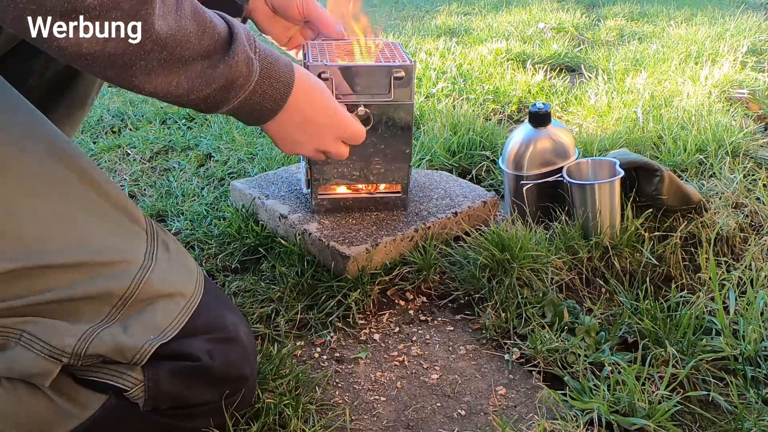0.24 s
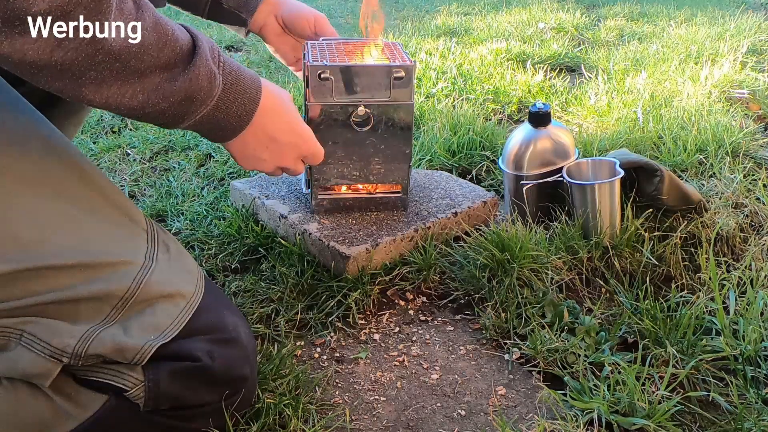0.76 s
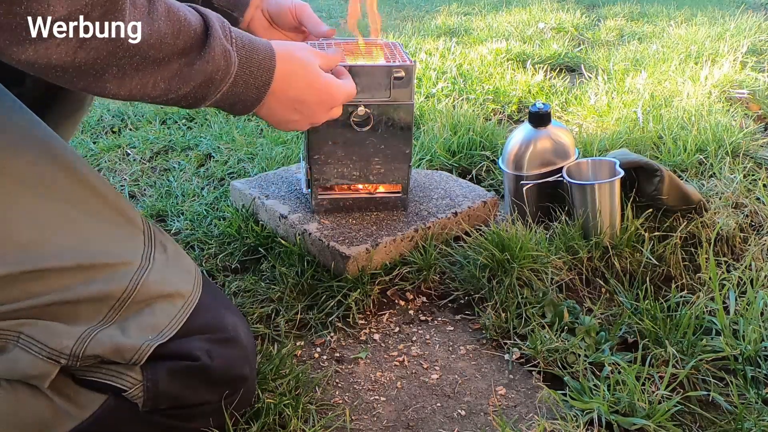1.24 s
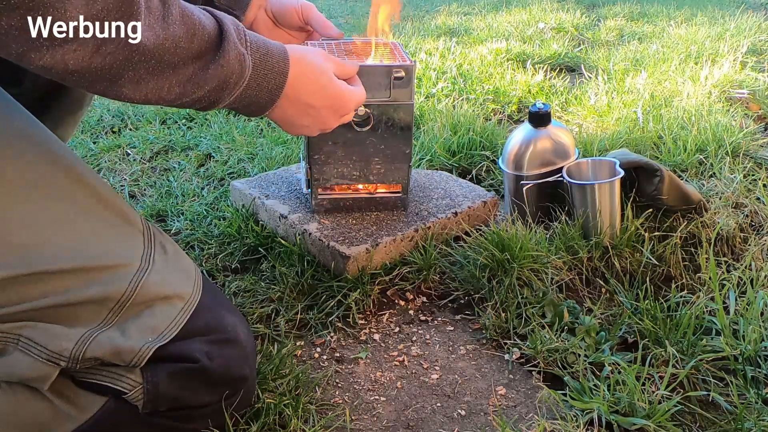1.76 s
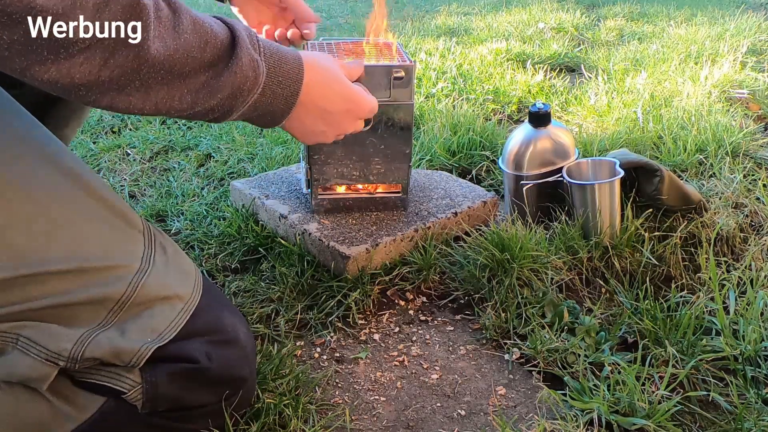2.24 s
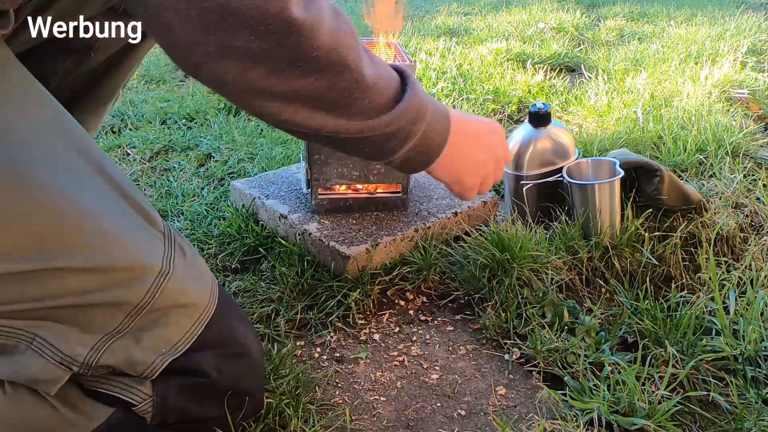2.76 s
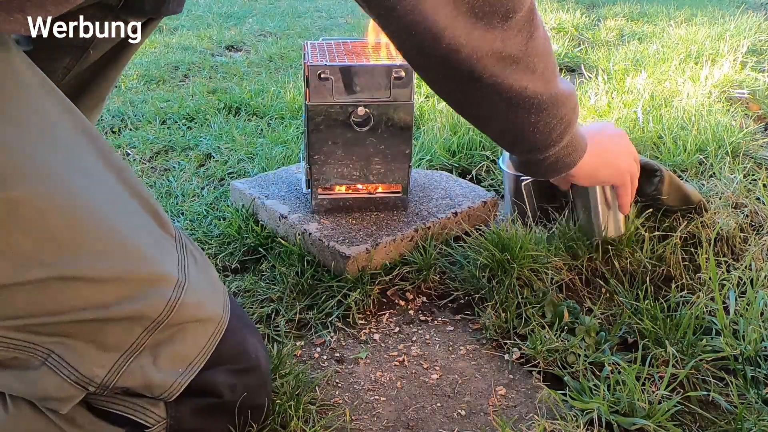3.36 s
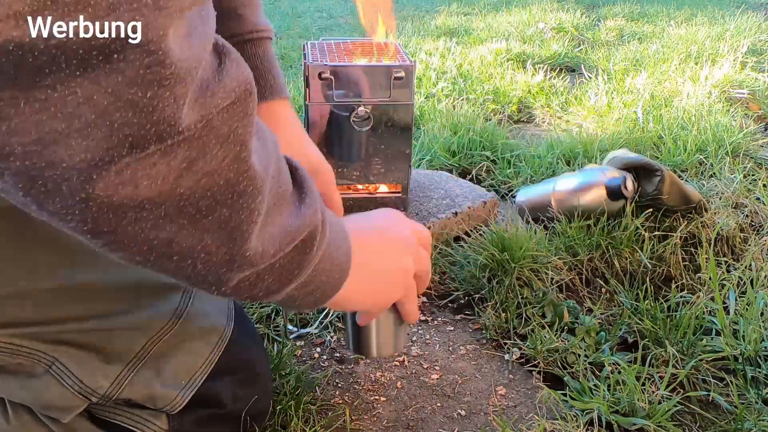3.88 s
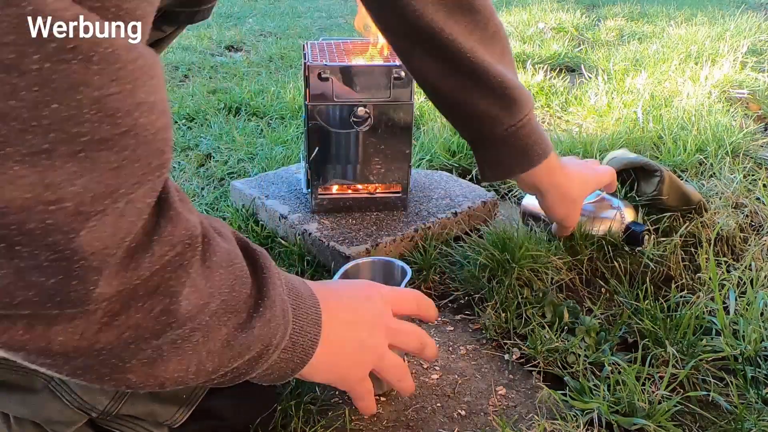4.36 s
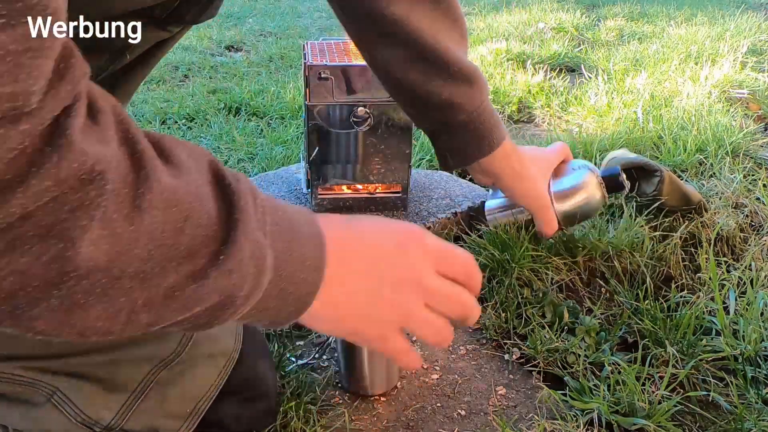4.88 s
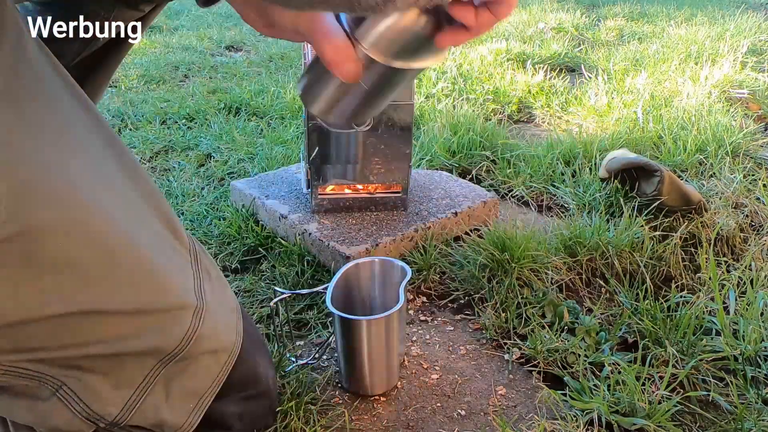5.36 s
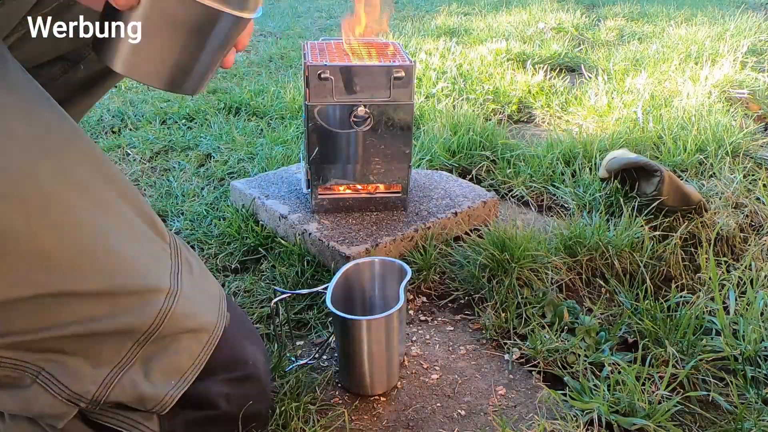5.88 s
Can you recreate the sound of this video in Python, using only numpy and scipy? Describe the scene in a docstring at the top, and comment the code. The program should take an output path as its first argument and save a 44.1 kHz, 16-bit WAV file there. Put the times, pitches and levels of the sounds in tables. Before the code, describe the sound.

Wind rumbles over small metallic clicks and a bright scraping clank, followed by hollow cup knocks, ringing clinks and a sloshing canteen's wobbling low hum.

```python
"""Someone kneels on a lawn in gusty wind; sheet steel clicks and snaps as a grate goes on a small wood stove.
The grate slides home in weakening slips: bursts of chatter through dense sheet ringing and longer sine modes.
A steel cup knocks hollowly, sings and clinks; the canteen's gliding sines bend as water sloshes inside.
A palm then slides on the canteen. Throughout, shaped noise makes wind rumble, open air and rustling clothes;
short resonant bursts make dull thuds, ticking twigs and grit."""
import sys
import numpy as np
from scipy import signal
from scipy.fft import rfft, irfft
from scipy.io import wavfile
from scipy.ndimage import uniform_filter1d

SR = 44100
rng = np.random.default_rng(int(sys.argv[2]) if len(sys.argv) > 2 else 0)


def waveform_to_disk(signal):
    """Save audio, clipped to [-1, 1], as 16-bit WAV at the path in sys.argv[1]."""
    frames = np.transpose(np.atleast_2d(signal))
    scaled = np.clip(frames, -1, 1) * 32767
    samples = np.round(scaled).astype(np.int16)
    wavfile.write(sys.argv[1], SR, samples)


N = 270421
T = np.arange(N) / SR


def undb(db):
    """Decibels to gain."""
    return 10 ** (np.asarray(db) / 20)


def curve(rows, column=1):
    """One column of a table, joined by straight lines in time."""
    rows = np.array(rows)
    return np.interp(T, rows[:, 0], rows[:, column])


def add(out, at_s, sound):
    """Mix a sound in from a given moment on."""
    start = int(at_s * SR)
    out[start:start + len(sound)] += sound[:N - start]


def colour_db(points, hz):
    """A spectrum read on a log-frequency axis."""
    f, db = np.transpose(points)
    return np.interp(np.log(hz + 1), np.log(f), db)


def response(db_of_hz, size=2048):
    """Causal (minimum-phase) impulse response of unit energy with the given spectral shape."""
    hz = np.arange(size // 2 + 1) * SR / size
    cepstrum = irfft(np.log(undb(db_of_hz(hz)) + 1e-6))
    # folding the cepstrum puts the energy as early as possible
    cepstrum[1:size // 2] *= 2
    cepstrum[size // 2 + 1:] = 0
    h = irfft(np.exp(rfft(cepstrum)))
    return h / np.linalg.norm(h)


def grains(count, spread_db):
    """Dense micro-impacts of uneven size, rms 1."""
    x = rng.standard_normal(count) * undb(spread_db * rng.standard_normal(count))
    return x / x.std()


def fade(t, rise_s, t60_s):
    """A straight rise and an exponential decay."""
    return np.minimum(t / rise_s, 1) * undb(-60 * np.maximum(t - rise_s, 0) / t60_s)


def burst(db, rise_s, t60_s, click_db=16):
    """One contact: chatter that dies away, with a click at full contact that slower rises soften."""
    t = T[:SR // 2]
    force = fade(t, rise_s, t60_s) * grains(len(t), spread_db=4.5)
    force[int(rise_s * SR)] += undb(click_db) * np.exp(-rise_s / 0.00084)
    return undb(db) * force


def walk(rate):
    """Smooth random wander with a spread of 1, from about `rate` new values a second."""
    k = int(SR / rate)
    steps = np.repeat(rng.standard_normal(N // k + 1), k)
    x = uniform_filter1d(steps, k)[:N]
    return x / x.std()


def shaped(x, points):
    """A steady signal given a spectrum, rms 1."""
    gain = undb(colour_db(points, np.arange(N // 2 + 1) * SR / N))
    y = irfft(rfft(x) * gain, N)
    return y / y.std()


def swells(rows, rest=0):
    """Gain of bell-shaped swells whose power adds to a resting gain."""
    power = rest ** 2
    for at_s, db, width_s in rows:
        power = power + undb(db) ** 2 * np.exp(-((T - at_s) / width_s) ** 2)
    return np.sqrt(power)


def tap(at_s, db, centre_hz, t60_s, sharpness, order):
    """A small blow coloured by one resonance."""
    def resonance_db(hz):
        detune = hz / centre_hz - centre_hz / (hz + 1)
        return -10 * order * np.log10(1 + (sharpness * detune) ** 2)

    out = np.zeros(N)
    add(out, at_s, signal.fftconvolve(burst(db, .0006, t60_s), response(resonance_db)))
    return out


def sheet_ring(db, t60_s):
    """The direct sound plus a crowd of short-lived modes, shared by every contact on one object."""
    t = T[:SR // 8]
    h = fade(t, 0.001, t60_s) * rng.standard_normal(len(t))
    h *= undb(db) / np.linalg.norm(h)
    h[0] = 1
    return h / np.linalg.norm(h)


def steel(contacts, body, modes):
    """Each contact chatters through the dense, short resonances of the sheet and wakes a few longer modes.

    contacts: t/s, level/dB, rise/s, t60/s, tilt/(dB per octave), ring relative to the contact/dB
    """
    t, out = T[:SR // 3], np.zeros(N)
    mode_hz, mode_db, mode_t60 = np.transpose(modes)[:, :, None]
    crowd = sheet_ring(db=-3, t60_s=0.036)
    for at_s, db, rise_s, t60_s, tilt_db, ring_db in contacts:
        sheet = response(lambda hz: colour_db(body, hz) + tilt_db * np.log2(1 + hz / 1000))
        chatter = burst(db, rise_s, t60_s)
        add(out, at_s, signal.fftconvolve(chatter, signal.fftconvolve(sheet, crowd)))
        # every point of contact shares its energy differently among the modes
        share = undb(mode_db + 1.0 * rng.standard_normal(mode_db.shape))
        tones = np.sin(2 * np.pi * (mode_hz * t + rng.random(mode_hz.shape)))
        # the chatter keeps feeding the modes, so a long scrape rings longer
        envelope = fade(t, rise_s, np.hypot(mode_t60, t60_s / 2))
        ring = (share * envelope * tones).sum(axis=0)
        add(out, at_s, undb(db + ring_db) * np.sqrt(2) * ring / np.linalg.norm(share))
    return out


def open_air():
    """Broad noise of the open air whose level wanders slowly."""
    # Spectrum of the air: f/Hz, relative level/dB
    air_colour = [(30, 5), (70, 6), (130, 3), (250, -0.5), (500, -5.5), (1000, -9.5), (1600, -12.5),
                  (2500, -24.5), (5000, -28), (8500, -21.5), (10500, -26), (16000, -27.5)]
    return shaped(rng.standard_normal(N), air_colour) * undb(-60.5 + 1.6 * walk(6.8))


def wind():
    """Slow eddies push on the microphone; only their upper edge is heard, as rumble that follows the gusts."""
    # Spectrum of the eddies: f/Hz, relative level/dB
    wind_colour = [(2, 12.5), (6, 26.5), (13, 9.5), (25, -0.5), (40, -8.5), (60, -23.5), (100, -32.5),
                   (200, -46), (500, -64), (1500, -85)]
    # Gusts: t of the peak/s, level/dB, half-width (at 1/e power)/s
    gusts = [(.05, -38.5, 0.13), (.38, -37.5, 0.14), (.78, -44.5, 0.13), (1.47, -34, 0.052),
             (1.75, -39.5, .11), (2.3, -41.5, 0.16), (3.27, -51, 0.034), (4.05, -60.5, 0.051),
             (4.46, -56, 0.041), (5.62, -58.5, 0.11)]
    # Breeze between the gusts, dying down overall: t/s, level/dB
    breeze = [(0, -52), (2.6, -47), (3.0, -59), (4.6, -59), (5.2, -71), (6.13, -67.5)]
    eddies = shaped(rng.standard_normal(N), wind_colour)
    heard = signal.sosfiltfilt(signal.butter(2, (20, 70), "band", fs=SR, output="sos"), eddies)
    power = uniform_filter1d(heard ** 2, size=SR // 5)
    strength = np.sqrt(uniform_filter1d(power, size=SR // 5))
    # level the audible rumble before the gusts shape it
    return eddies / strength * swells(gusts, rest=undb(curve(breeze)))


def clothes():
    """Sleeves and trousers rustle: grainy noise swells with each movement and flutters in level."""
    # Spectrum of the cloth: f/Hz, relative level/dB
    cloth_colour = [(150, 9), (600, 9.5), (1500, 5), (2500, 3.5), (4000, 0.5), (6500, -3.5), (8700, -2),
                    (10000, -20), (13000, -8.5), (16000, -21)]
    # Arm and leg movements: t of the peak/s, level/dB, half-width (at 1/e power)/s
    moves = [(0, -68, 0.24), (3.0, -62.5, 0.26), (3.6, -60.5, 0.22), (3.8, -55.5, 0.039),
             (4.25, -66.5, 0.33), (4.88, -65, .14), (5.49, -52.5, 0.046), (5.6, -58.5, 0.053),
             (5.78, -58, 0.064), (6.05, -58.5, 0.12)]
    rustle = shaped(grains(N, spread_db=3.5), cloth_colour)
    return rustle * swells(moves, rest=undb(-70)) * undb(2.03 * walk(40))


def sliding_palm():
    """A palm catches and slides on the canteen: very uneven grains in short swells."""
    # Spectrum of skin on steel: f/Hz, relative level/dB
    grip_colour = [(880, -36), (1500, -18), (3150, -9), (3620, -9), (4420, -2), (6760, -3.5), (8660, 1),
                   (13500, -4), (16000, -12)]
    # Slides of the palm: t of the peak/s, level/dB, half-width (at 1/e power)/s
    slides = [(5.51, -60, .04), (5.585, -50, 0.024), (5.71, -68, 0.034)]
    catches = grains(N, spread_db=8) * undb(3 * walk(150))
    return shaped(catches, grip_colour) * swells(slides)


def grit(count):
    """Faint bright ticks of grit fall at random while the canteen is handled."""
    from_s, to_s = 4.3, 6.05
    level_db, spread_db = -56, 2
    out = np.zeros(N)
    for when, size in rng.random((count, 2)):
        at_s = from_s + when * (to_s - from_s)
        out += tap(at_s, level_db + spread_db * (2 * size - 1), 9400, .03, sharpness=1, order=1)
    return out


def ticks():
    """Clear ticks of twigs and metal: small blows on one resonance; a sharper one rings longer."""
    # Twigs and small ticks of metal: t/s, level/dB, f/Hz, sharpness Q
    tick_rows = [(2.563, -54.5, 6000, .17), (2.9426, -55, 3080, 2.5), (3.083, -50.5, 4870, 0.59),
                 (3.789, -49, 9000, .57), (4.25, -43.5, 2140, 7), (4.3743, -50.5, 5800, 8.7),
                 (5.0633, -48, 3140, 15), (5.112, -51.5, 8900, .8), (5.228, -42.5, 2820, 1.5),
                 (5.479, -50, 3000, .95), (5.639, -51.5, 11000, 0.97)]
    return sum(tap(at_s, db, hz, .03 * q ** .22, q, order=1) for at_s, db, hz, q in tick_rows)


def thuds():
    """Dull blows on hand and soil, each through one broad, steep-sided resonance."""
    # Thuds: t/s, level/dB, f/Hz, t60/s
    thud_rows = [(.23, -44, 680, .073), (3.59, -55, 460, 0.034), (3.658, -52.5, 193, 0.14),
                 (3.79, -51.5, 203, 0.3), (3.915, -50, 181, .074), (3.968, -42.5, 209, .087),
                 (4.134, -38, 240, 0.29), (4.727, -46, 246, 0.24), (4.885, -33.5, 927, .029),
                 (5.229, -40.5, 630, 0.1), (5.243, -41, 226, .06)]
    return sum(tap(*row, sharpness=1.25, order=2) for row in thud_rows)


def stove_contacts():
    """Every knock on the stove, followed by its loose panel settling."""
    # Knocks on the stove: t/s, level/dB, t60/s, tilt/(dB per octave)
    knocks = [(.157, -57, 0.13, -7), (.202, -57, 0.27, -3.5), (.232, -43.5, 0.076, -2.5),
              (1.4463, -38, .11, 1), (1.497, -56, .1, -8), (1.574, -46.5, .15, 6),
              (1.9054, -42.5, 0.043, -2.5), (1.9832, -38.5, 0.077, 1), (2.123, -57.5, .12, -7)]
    contacts = []
    for at_s, db, t60_s, tilt_db in knocks:
        # a softer contact is duller, rises more slowly and leaves more to the modes
        rise_s = 0.0013 * 2 ** (-tilt_db / 6)
        contacts.append((at_s, db, rise_s, t60_s, tilt_db, -10.5 - 0.69 * tilt_db))
        # the panel settles later, weaker, duller, with a slower rise and its own decay
        contacts.append((at_s + .013, db - 12.5, 2 * rise_s, 0.14, tilt_db - 2, -5))
    return contacts


def stove():
    """Sheet steel clicks: knocks and settling panels excite the stove's body and modes."""
    # Broad colour of the stove: f/Hz, relative level/dB
    body = [(240, -12), (400, -6), (1400, -8), (1650, -15), (2400, -5), (2670, -9.5), (3020, 0.5),
            (3580, -8), (4510, -1.5), (6150, -8.5), (7510, -2), (9760, -10.5), (10200, -16.5),
            (12900, -8.5), (16000, -26)]
    # Ringing modes of the stove: f/Hz, relative level/dB, own t60/s
    modes = [(1307, 6, .06), (2200, 1, 0.07), (2970, -6, 0.075), (3170, 7, 0.14), (4360, 6, 0.05),
             (4220, 13, .05), (5300, -13.5, .04), (5900, 3.5, 0.17), (6740, -7, .05), (7410, -12, .05),
             (7950, -23, .04), (8280, 9, 0.051), (9610, -10, .04), (12500, -11, .03), (12902, -3, .03)]
    return steel(stove_contacts(), body, modes)


def snap():
    """One very short, bright crack at the stove with well damped resonances."""
    # The snap, one row: t/s, level/dB, t60/s
    snap_row = (1.5708, -22.5, 0.013)
    # Resonances of the snap: f/Hz, width/Hz, height of the boost relative to 7 dB, as a level/dB
    snap_peaks = [(1910, 88, 9), (4330, 170, -8), (5620, 89, -10), (7420, 100, -4), (8500, 160, -3),
                  (9560, 97, -7), (12700, 200, -13), (13600, 270, 3)]
    # Broad colour of the snap: f/Hz, relative level/dB
    snap_body = [(350, -40), (600, -10), (1450, -14.5), (1960, -10.5), (2440, -6.5), (3830, -11.5),
                 (4460, 0), (5190, -7), (7110, -1.5), (7620, -11), (8390, 1.5), (10300, -13), (13800, -1.5),
                 (14700, -13), (16000, -16)]

    def snap_colour_db(hz):
        peaks = sum(undb(d) / np.hypot(1, 2 * (hz - f) / width) for f, width, d in snap_peaks)
        return colour_db(snap_body, hz) + 7 * peaks

    at_s, db, t60_s = snap_row
    out = np.zeros(N)
    add(out, at_s, signal.fftconvolve(burst(db, 0.00044, t60_s), response(snap_colour_db)))
    return out


def grate_contacts(count):
    """The grate catches on the rim, then sticks and slips home, each slip weaker and longer."""
    # Catches: t/s, level/dB, rise/s, t60/s, tilt/(dB per octave), ring relative to the contact/dB
    catches = [(2.175, -48, 0.019, .1, -5.5, -8), (2.197, -45, 0.0017, 0.052, -1, -8),
               (2.2048, -25.5, 0.0014, 0.042, 3, -13)]
    first_s, gap_s = 2.221, .0115
    first_db, fall_db = -35.5, 1.88
    first_t60_s, lengthening = 0.049, 1.47
    contacts = list(catches)
    for k in range(count):
        t60_s = first_t60_s * lengthening ** k
        contacts.append((first_s + k * gap_s, first_db - k * fall_db, 0.0011, t60_s, 0.2, -0.5))
    return contacts


def grate():
    """The grate scrapes and rings as its catches and slips excite its body and modes."""
    # Broad colour of the grate: f/Hz, relative level/dB
    body = [(180, -54), (300, -17), (447, -17.5), (1120, -8), (1210, -11), (1320, -4), (1580, -14),
            (2250, -6.5), (2700, -10.5), (4230, -2.5), (4830, -7.5), (8500, -7), (10700, -15), (13300, -8),
            (16000, -31)]
    # Ringing modes of the grate: f/Hz, relative level/dB, own t60/s
    modes = [(1330, -6, 0.23), (1800, -15, 0.46), (4020, -5, .16), (4095, 5, 0.17), (4380, 8.5, .08),
             (5198, 5, .13), (5330, -4, 0.13), (5940, -16, .16), (6650, -8, .15), (6970, -4, .18),
             (7140, 2, 0.14), (7500, 1, .16), (8380, 9, 0.1), (8330, -19, .14), (8520, 1, 0.11),
             (8553, 1, 0.12), (9030, 3, 0.12), (8988, 0, .16), (9981, -9, .14), (12950, 4, .08),
             (12700, -8, .14), (13840, -13, .08)]
    return steel(grate_contacts(count=5), body, modes)


def cup_tones():
    """The gripped cup knocks hollowly on the upright canteen; the free cup sings in pure tones."""
    # Hollow knocks: t/s, level/dB, t60/s
    clonks = [(3.3665, -30.5, 0.1), (3.397, -42.5, 0.16), (3.416, -37.5, 0.11)]
    # Modes of the knocks, slightly detuned at each knock: nominal f/Hz, relative level/dB
    clonk_modes = [(400, -11), (555, -17), (620, -1.5), (655, 4.5), (695, 5), (770, 1), (860, -5),
                   (940, -1), (992, 1.5), (1045, -25)]
    # Singing of the free cup: t/s, f/Hz, peak level/dB, rise/s, t60/s
    singing = [(3.41, 1295, -50.5, .03, .85), (3.37, 1535, -65, .005, .6), (3.31, 1065, -59, .01, .2),
               (3.88, 1294, -61.5, .03, 1.6)]
    t, out = T[:SR], np.zeros(N)
    for at_s, db, t60_s in clonks:
        tone = np.zeros(len(t))
        for hz, mode_db in clonk_modes:
            detuned_hz = hz * (1 + 0.0067 * rng.standard_normal())
            tone += undb(mode_db) * np.sin(2 * np.pi * detuned_hz * t + rng.uniform(0, 2 * np.pi))
        add(out, at_s, undb(db) * fade(t, 0.0011, t60_s) * tone / tone.std())
    for at_s, hz, db, rise_s, t60_s in singing:
        add(out, at_s, undb(db) * fade(t, rise_s, t60_s) * np.sin(2 * np.pi * hz * t))
    return out


def cup_contacts():
    """The cup is lifted, clinks on its rim and scrapes on its base; each excites its own steel modes."""
    # Contacts: t/s, level/dB, rise/s, t60/s, tilt/(dB per octave), ring relative to the contact/dB
    lifts = [(3.369, -43, .003, 0.092, 0, -1), (3.412, -48, 0.014, 0.21, 0, -5.5)]
    clinks = [(4.032, -41.5, 0.015, 0.063, 2.8, -15), (4.0508, -27.5, 0.0011, 0.086, 1, -4.5),
              (4.0965, -33.5, .001, 0.052, 6.5, -27), (4.11, -35.5, 0.00089, 0.052, 3, -25)]
    scrapes = [(4.13, -36, 0.0042, 0.063, -3.5, -8), (4.138, -37, 0.0023, 0.29, -2, -4),
               (4.167, -43.5, .003, 0.29, -4, -10), (4.198, -49.5, 0.012, 0.12, 7, -9)]
    # Broad colour of each kind of contact: f/Hz, relative level/dB
    lift_body = [(760, -28), (1300, -3.5), (2020, -10.5), (2600, -2), (3840, -9), (4440, -10), (4830, -2.5),
                 (6150, -6.5), (6690, -12), (7750, -12.5), (16000, -26)]
    clink_body = [(530, -42), (900, -18.5), (1420, -24), (1620, -4), (1970, -20), (2470, -13),
                  (2890, -20.5), (3340, -10), (3860, -17), (7770, -13.5), (10400, -22.5), (14000, -19),
                  (16000, -30)]
    scrape_body = [(590, -7), (1000, -4.5), (1910, -14), (2050, -9), (2360, -16), (2470, -11), (3580, -17),
                   (4310, -6.5), (4520, -11.5), (12800, -21), (16000, -30)]
    # Ringing modes of the lifted cup, its rim and its base: f/Hz, relative level/dB, own t60/s
    lift_modes = [(2655, 4, 0.02), (3760, 1, .04), (5000, -5, 0.1), (5980, -2, .055), (6293, -1, .045),
                  (6390, -19, .04), (8100, -4, .06)]
    rim_modes = [(1620, 2.5, 0.081), (1642, 3, 0.062), (1780, -20, .05), (2440, -10, 0.19),
                 (3310, -9, 0.24), (3680, -12, 0.19), (4220, -9, 0.2), (5240, -16, 0.094),
                 (6309, -12, 0.09), (6770, -3, .04), (7250, -10, .04), (7540, -4, 0.042), (9006, -7, .04)]
    base_modes = [(1282, 6.5, 0.12), (2120, 8, 0.11), (2500, 4.5, 0.11), (4230, 3, 0.18), (4620, -12, .1),
                  (5600, -1, 0.092), (6800, -1, .05)]
    lifted = steel(lifts, lift_body, lift_modes)
    clinking = steel(clinks, clink_body, rim_modes)
    scraping = steel(scrapes, scrape_body, base_modes)
    return lifted + clinking + scraping


def canteen_rubs():
    """Rubs on the canteen chatter through its steel wall and wake its short modes."""
    # Rubs: t/s, level/dB, rise/s, t60/s, tilt/(dB per octave), ring relative to the contact/dB
    rubs = [(4.726, -52, 0.0028, 0.094, -3.5, -24), (4.748, -49.5, 0.02, 0.23, 1, -22),
            (4.783, -53.5, .003, 0.33, 5.5, -6), (4.8845, -45, 0.0011, 0.16, -3, 7),
            (4.932, -48, 0.0074, 0.12, 5.5, -25)]
    # Broad colour of the canteen: f/Hz, relative level/dB
    body = [(530, -30), (900, -17), (1080, -21.5), (1460, -9), (1950, -25), (3380, -19.5), (6640, -26),
            (8150, -18), (10400, -29), (13800, -27.5), (16000, -40)]
    # Ringing modes of the canteen: f/Hz, relative level/dB, own t60/s
    modes = [(785, 7, 0.029), (872, 8, 0.11), (1179, -11, .04), (1275, 3, 0.032), (1485, -5, 0.053),
             (3330, -18, 0.043), (4260, -15, .04), (5500, -7, .03)]
    return steel(rubs, body, modes)


def wall_swing(channels):
    """Strength of the lowest wall modes: each bump takes over the ring and sets it anew."""
    # Bumps on the canteen: t/s, contact/s, t60/s, then for the first, second and third mode
    # level/dB, the third before its wall-mode offset
    bumps = [(3.966, .015, 1, -38.5, -53, -61), (4.052, 0.012, 0.79, -31.5, -33, -50),
             (4.14, 0.0066, 0.12, -21, -23, -31), (4.159, .0041, 0.29, -19, -25.5, -29),
             (4.201, 0.024, .26, -50, -29.5, -30.5), (4.769, .0029, 0.08, -38, -45, -66),
             (4.783, 0.0029, .12, -30, -27.5, -60), (4.835, 0.0054, 0.23, -44, -55, -75),
             (4.886, .0023, 0.16, -34.5, -41, -48)]
    swing = np.zeros((channels, N))
    for at_s, contact_s, t60_s, *mode_db in bumps:
        start = int(at_s * SR)
        since = T[:N - start]
        old_ring = swing[:, start:] * np.maximum(1 - since / contact_s, 0)
        new_ring = undb(mode_db)[:, None] * fade(since, contact_s, t60_s)
        swing[:, start:] = old_ring + new_ring
    return swing


def canteen_tones():
    """Sloshing water bends the wall modes; the two highest swing along with the second."""
    # Two sloshes of water along the wall: t/s, first mode f/Hz, second mode f/Hz
    slosh_up = [(3.97, 309.4, 503.4), (4.03, 309.2, 472), (4.06, 360, 451.7), (4.09, 366, 497),
                (4.15, 383, 514.3), (4.2, 413.7, 530.3), (4.26, 412, 565), (4.36, 426, 592)]
    slosh_back = [(4.77, 406, 577.4), (4.82, 450.7, 583), (4.87, 463, 563.5), (4.892, 410, 572),
                  (4.92, 351, 491), (5.0, 311, 455)]
    # Higher modes follow the second by a power law (0 stays still): f at rest/Hz, exponent, offset level/dB
    wall_modes = [(615, 1.6, -0.5), (986, .65, -21), (1530, 0, -21)]
    second_rest_hz = 516
    slosh = list(slosh_up) + list(slosh_back)
    first_hz, second_hz = curve(slosh, column=1), curve(slosh, column=2)
    first, second, third = wall_swing(channels=3)
    modes = [(first_hz, first), (second_hz, second)]
    for (hz, bend, db), swing in zip(wall_modes, (third, second, second)):
        modes.append((hz * (second_hz / second_rest_hz) ** bend, undb(db) * swing))
    out = np.zeros(N)
    for hz, swing in modes:
        # ripples on the water make pitch and level tremble slightly
        rippled_hz = hz * (1 + .003 * walk(80))
        tremble = undb(.7 * walk(60))
        out += swing * tremble * np.sin(2 * np.pi * np.cumsum(rippled_hz) / SR)
    return out


def scene():
    """Everything close to the microphone in the open, with no room."""
    background = open_air() + wind() + clothes() + sliding_palm()
    small_sounds = grit(count=8) + ticks() + thuds()
    wood_stove = stove() + snap() + grate()
    cup = cup_tones() + cup_contacts()
    canteen = canteen_rubs() + canteen_tones()
    return (background + small_sounds + wood_stove + cup + canteen)[None]


def record(dry):
    """The recorder cuts the top steeply above 15.9 kHz."""
    return signal.sosfilt(signal.ellip(8, .2, 70, 15900, fs=SR, output="sos"), dry)


dry = scene()
out = record(dry)
waveform_to_disk(out)
```